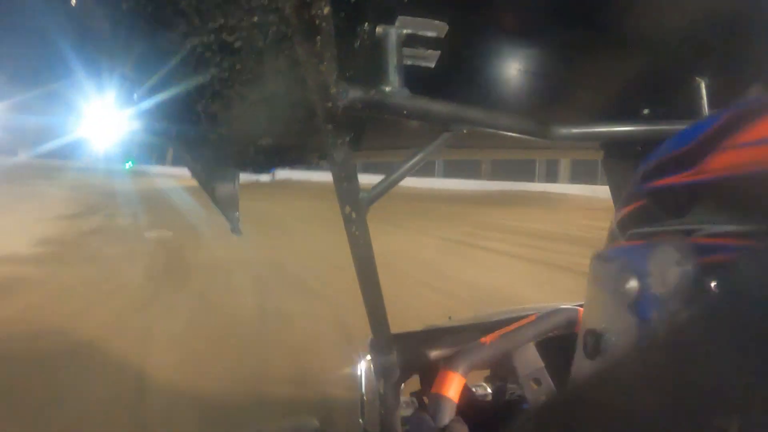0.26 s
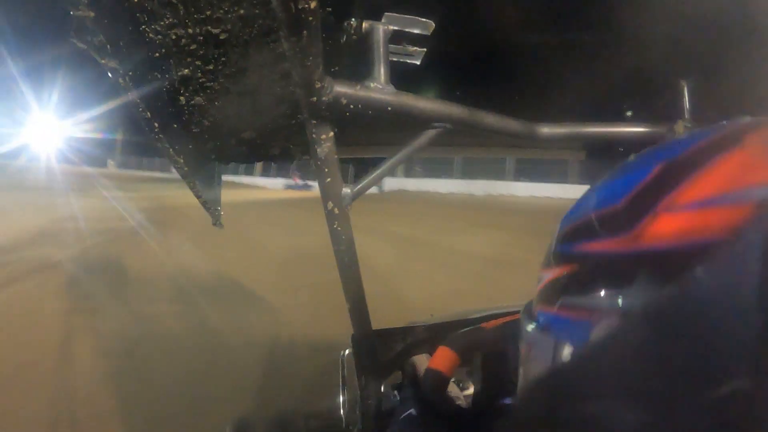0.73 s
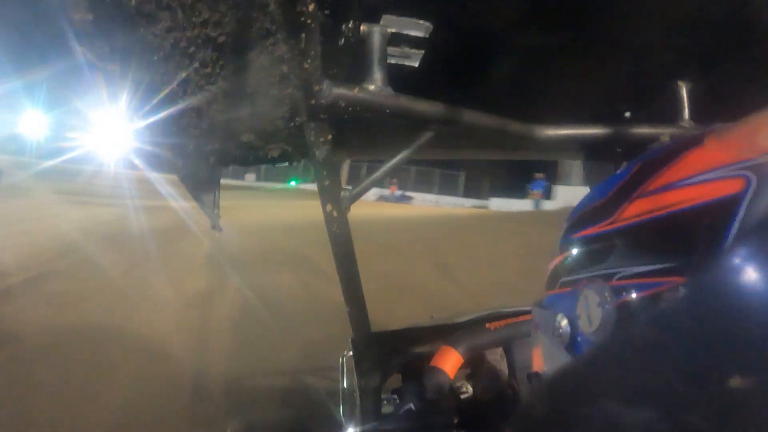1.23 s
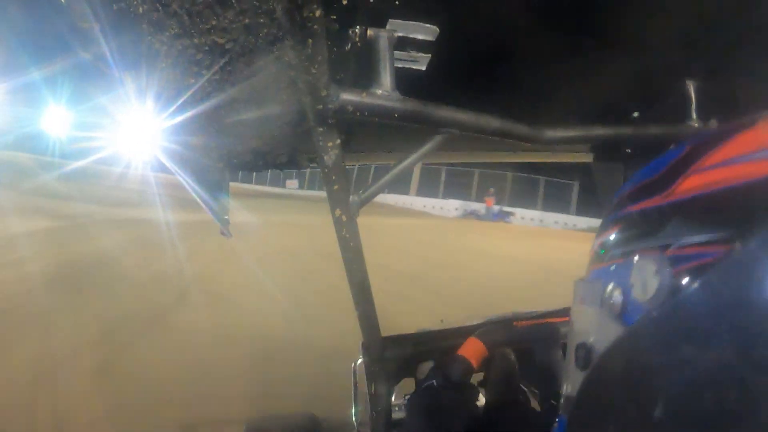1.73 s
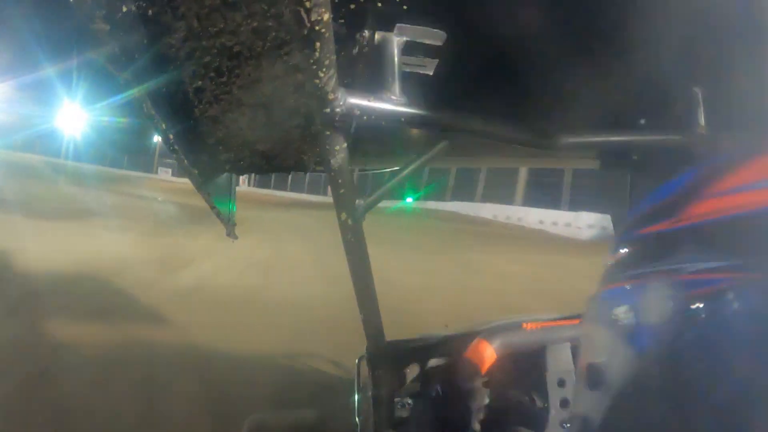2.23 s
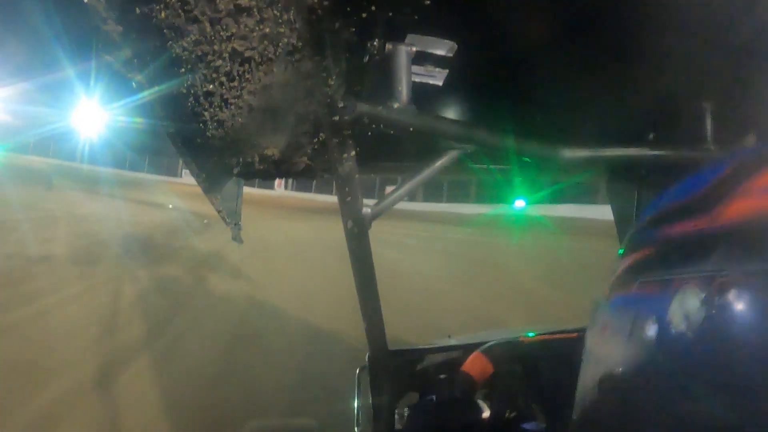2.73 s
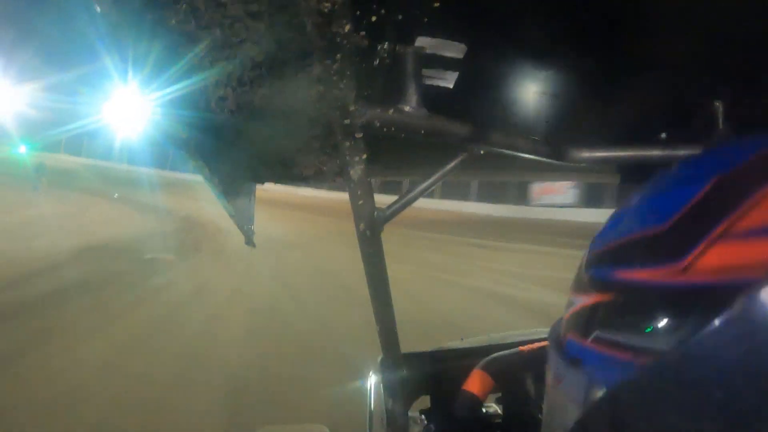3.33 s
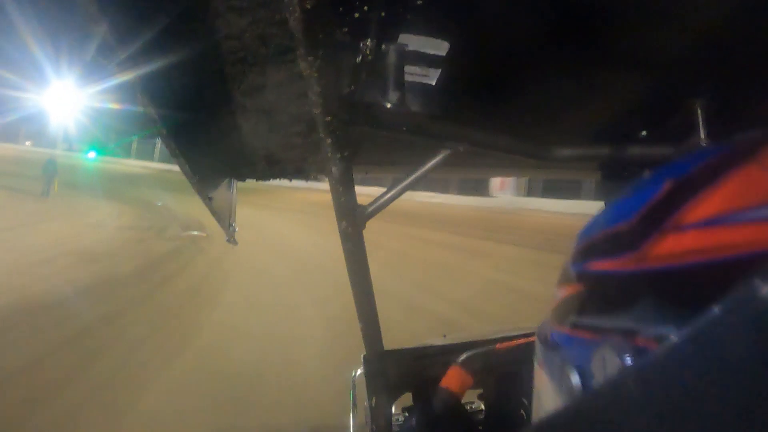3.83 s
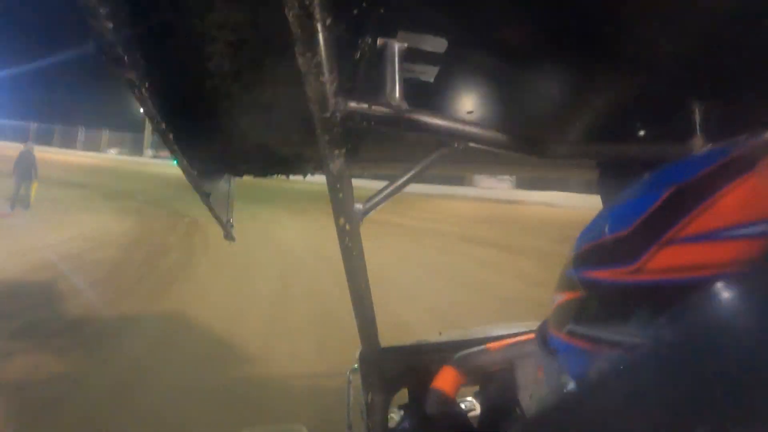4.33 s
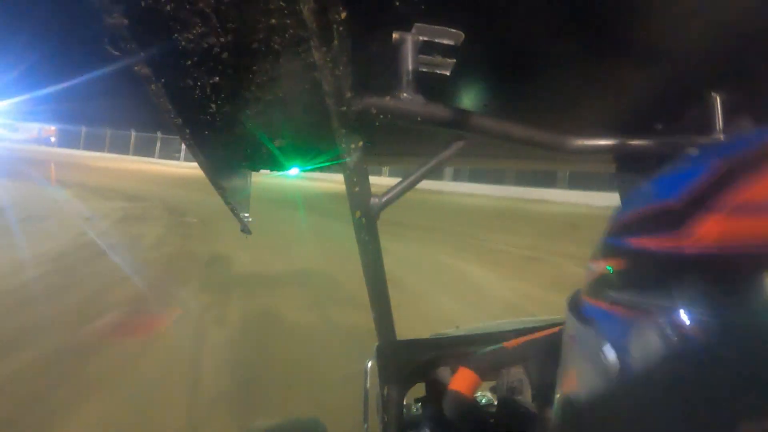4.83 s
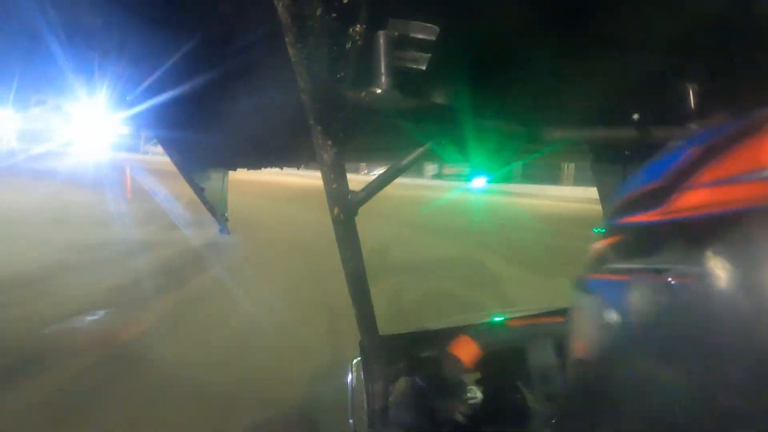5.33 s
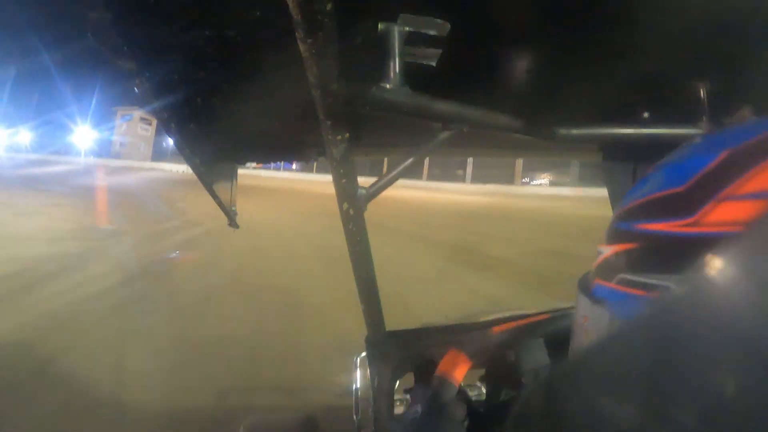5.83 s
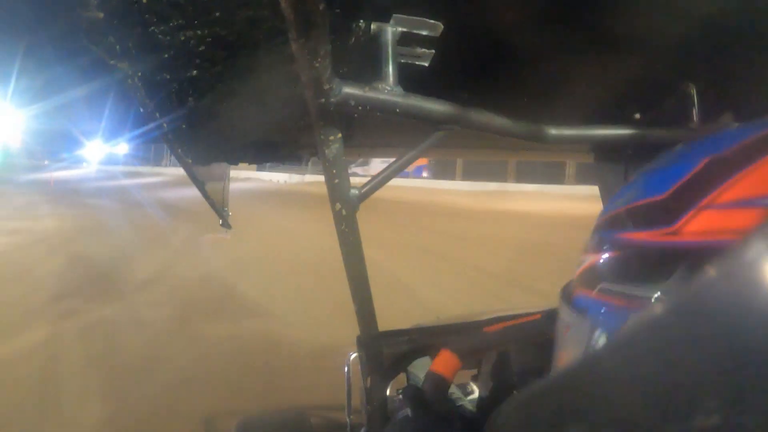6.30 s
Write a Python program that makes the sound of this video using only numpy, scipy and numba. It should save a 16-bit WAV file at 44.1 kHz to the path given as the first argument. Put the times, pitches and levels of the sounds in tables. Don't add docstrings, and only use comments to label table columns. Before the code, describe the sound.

A lumpy, throbbing race engine drones at steady revs inside a boxy, muffled case, over deep wind rumble, gas roar, rattles and grit.

```python
import sys
import numpy as np
from scipy import signal
from scipy.fft import rfft, irfft
from scipy.io import wavfile
from scipy.ndimage import uniform_filter1d
from numba import njit

SR = 44100
rng = np.random.default_rng(int(sys.argv[2]) if len(sys.argv) > 2 else 0)


def generate_wav(signal):
    frames = np.transpose(np.atleast_2d(signal))
    scaled = np.clip(frames, -1, 1) * 32767
    pcm = np.round(scaled).astype(np.int16)
    wavfile.write(sys.argv[1], SR, pcm)


def decibels_to_gain(level_db):
    exponent = np.asarray(level_db, float) / 20
    return 10 ** exponent


N = 289296

# (frequency [Hz], level [dB])
CASE_WALL = [(400, -11), (800, -4), (1200, 0.5), (1600, -7.5), (2100, -15), (3000, -12), (3500, -11.5),
             (5000, -31.5), (6500, -43.5), (8300, -40.5), (9500, -57.5), (11000, -64.5), (14000, -64)]
# (centre [Hz], width [Hz], boost [dB])
CASE_RINGS = [(1004, 220, 2.5), (1165, 23, 5), (1208, 30, 2.5), (1339, 160, 4.5), (1480, 60, 1.5),
              (1850, 90, 1.5), (2344, 64, 3.5), (2750, 22, 3), (2829, 140, 6.5), (3300, 120, -2.5),
              (5060, 390, 5), (6200, 330, 7.5)]
# (time [s], loss [dB])
FLOATS = [(.1, 1), (.57, -0.5), (.77, 1), (.9, 3), (1.06, 0.5), (1.55, 1.5), (1.8, 2), (1.94, 5.5),
          (2.25, 1), (2.46, 2.5), (2.88, 3.5), (2.93, 7), (4.23, 6.5), (4.46, 1.5), (5.42, 3.5),
          (5.97, 3.5), (6.24, 3.5)]


def level(x, db):
    return x * decibels_to_gain(db) / np.sqrt(np.mean(x ** 2))


def walk(rate_hz):
    hold = int(SR / rate_hz)
    steps = np.repeat(rng.standard_normal(N // hold + 1), hold)
    wander = uniform_filter1d(uniform_filter1d(steps, hold), hold)[:N]
    return (wander - wander.mean()) / wander.std()


def bumps(table, width_s):
    t = np.arange(N) / SR
    return sum(db * np.exp(-((t - s) / width_s) ** 2) for s, db in table)


def band(x, lo_hz, hi_hz):
    return signal.sosfilt(signal.butter(2, [lo_hz, hi_hz], "band", fs=SR, output="sos"), x)


def colour(x, spectrum, peaks=()):
    size = 8192
    hz = np.arange(size // 2 + 1) * SR / size + 1
    table_hz, table_db = np.transpose(spectrum)
    db = np.interp(np.log(hz), np.log(table_hz), table_db)
    for centre_hz, width_hz, boost_db in peaks:
        db = db + boost_db / (1 + (2 * (hz - centre_hz) / width_hz) ** 2)
    cepstrum = irfft(db * np.log(10) / 20)
    cepstrum[1:size // 2] *= 2
    cepstrum[size // 2 + 1:] = 0
    return signal.fftconvolve(x, irfft(np.exp(rfft(cepstrum))))[:N]


def throttle():
    # (start [s], length [s], rise over coasting [dB])
    squeezes = [(0.862, .1, 18), (1.459, 0.14, 12), (1.704, 0.36, 11.5), (2.272, .38, 11),
                (2.705, 0.088, 13), (2.888, .34, 14), (3.865, .08, 1.5), (4.055, 0.21, 7.5),
                (4.388, 0.054, 11), (4.78, .07, 6), (5.199, 0.16, 7.5), (5.56, 0.086, 5), (6.166, 0.06, 3)]
    t = np.arange(N) / SR
    held = sum(db * ((t > s) & (t < s + length)) for s, length, db in squeezes)
    return uniform_filter1d(held, size=int(0.06 * SR))


def crank_turns():
    # (time [s], crank speed [Hz])
    speeds = [
        (0, 48),
        (1.4, 47.8),
        (2, 48.5),
        (2.4, 49.3),
        (3.3, 49.94),
        (4.4, 50.32),
        (5.3, 49.8),
        (5.7, 48.25),
        (6.56, 47.48),
    ]
    times, hz = np.transpose(speeds)
    crank_hz = np.interp(np.arange(N) / SR, times, hz)
    return np.cumsum(crank_hz * (1 + 0.0029 * walk(8))) / SR


def airstream(throttle_db):
    lag_s = 0.85
    air_db = 1.1 * uniform_filter1d(throttle_db, size=int(lag_s * SR)) - 1.5 * bumps(FLOATS, 0.022)
    hiss = band(rng.standard_normal(N), 3600, 16000) * decibels_to_gain(0.97 * walk(18) + 0.51 * air_db)
    return level(colour(hiss, CASE_WALL, CASE_RINGS), -45.5)


def rumble():
    # (frequency [Hz], level [dB])
    rumble_tone = [(20, -32), (35, -17.5), (50, -2.5), (62, -2), (78, -5), (100, 2), (130, 2), (200, -1),
                   (240, -4), (330, -7.5), (430, -15), (550, -22.5), (800, -21.5), (1500, -48)]
    # (time [s], gain [dB])
    gusts = [(0.3, 2), (0.69, 3.5), (1.08, -0.5), (1.66, 10.5), (2.23, 6.5), (3.34, 11), (3.48, 3.5),
             (4.09, 7.5), (4.4, -1), (4.84, 5.5), (5.1, 1.5), (5.22, -2.5), (5.44, 7.5), (5.72, 9)]
    # (time [s], loss [dB])
    calms = [
        (0.15, 3),
        (0.49, 5),
        (1.55, -4),
        (2.1, 2.5),
        (2.41, -1),
        (3.02, -3),
        (4.47, 5.5),
        (5.62, 5.2),
        (5.86, -5),
        (6.51, 3.5),
    ]
    gust_s = 0.035
    rumble_db = -19.5 + 0.64 * bumps(gusts, gust_s) - 0.87 * bumps(calms, gust_s)
    return level(colour(rng.standard_normal(N), rumble_tone), 0) * decibels_to_gain(0.59 * rumble_db - 6.0)


def rattle(turns):
    # (time [s], peak [dB])
    grit = [(0.1948, -18.5), (0.2643, -14), (0.3135, -18), (0.45, -17), (0.8739, -14), (1.391, -15.5),
            (1.4451, -12.5), (1.644, -12), (1.698, -17), (2.152, -21.5), (2.2008, -8.5), (2.7566, -12),
            (2.7955, -16), (3.0639, -17), (3.1566, -9.5), (3.2176, -20.5), (3.7638, -14), (3.8597, -15),
            (4.0277, -15.5), (4.4072, -15.5), (4.6027, -19.5), (4.7688, -16), (5.01, -13), (5.577, -17.5),
            (5.9273, -11.5), (6.394, -10), (6.4588, -13.5), (6.5033, -7.5)]
    # (time [s], gain [dB])
    jolts = [(.2, 2), (.62, 5.5), (.68, 4), (.94, 6), (1.42, -0.5), (3.27, 6), (4.04, 2.5), (4.61, 3.5),
             (4.88, 3.5), (5.45, 5), (5.75, 1.5), (6.02, 2), (6.4, 2)]
    chance = rng.random((2, N))
    ticks_per_s = 6000
    hardness = decibels_to_gain(-1.6 * np.log(chance[1] + 1e-9))
    ticks = (chance[0] < ticks_per_s / SR) * hardness * rng.choice([-1, 1], N)
    ticks = level(ticks, 0) * (1 + 0.19 * np.cos(2 * np.pi * turns)) * decibels_to_gain(0.7 * walk(45))

    age = np.arange(1300) / (0.003 * SR)
    sprays = np.zeros(N)
    for s, db in grit:
        i = int(s * SR)
        grains = rng.standard_normal(len(age))
        sprays[i:i + len(age)] += decibels_to_gain(db + 25) * grains * age * np.exp(-age)

    low_ticks = band(ticks, 1910, 3640) * decibels_to_gain(0.77 * walk(25))
    high_ticks = band(ticks, 3600, 9000) * decibels_to_gain(0.66 * walk(30))
    struck = low_ticks + high_ticks + band(sprays, 2620, 3080)
    shake_db = 1.18 * bumps(jolts, 0.013) - 1.3 * bumps(FLOATS, 0.022) + 0.13 * walk(17)
    return level(colour(struck, CASE_WALL, CASE_RINGS), 0) * decibels_to_gain(-28.5 + shake_db + 1.44)


def roar(turns, load_db):
    # (time [s], loss [dB])
    falters = [
        (0.11, 9),
        (0.24, 8),
        (1.82, 5),
        (2.45, 3),
        (3.54, 2.5),
        (4.45, 5.5),
        (5.27, 1.9),
        (5.41, 2.5),
        (6.37, 6),
        (6.51, 3),
    ]
    puffs = 1 + 0.11 * np.cos(2 * np.pi * 4 * turns)
    gas = signal.sosfilt(signal.butter(2, 2300, fs=SR, output="sos"), rng.standard_normal(N))
    pulsed = gas * puffs * decibels_to_gain(0.23 * walk(40))
    roar_db = -21.5 + 0.053 * load_db - 0.57 * bumps(falters, 0.03)
    return level(colour(pulsed, CASE_WALL, CASE_RINGS), 0) * decibels_to_gain(roar_db)


def mount(load_db):
    # (time [s], loss [dB])
    ruts = [(0.08, 5.5), (0.42, 3), (0.53, -5), (0.89, 0), (1.01, -1), (1.23, 5.5), (1.5, 4), (1.65, -4),
            (2.0, 6), (2.2, 23), (2.33, 2), (2.47, 9), (3.03, 0), (3.11, 6), (3.19, 7), (3.43, 19),
            (3.93, 10), (4.23, -0.5), (4.31, 2.5), (4.84, 0), (5.1, 9), (5.3, 6), (5.89, 12.5), (6.2, 5.5),
            (6.4, 8), (6.48, -1.5)]
    # (time [s], gain [dB])
    kicks = [(.6, 3), (.75, -0.5), (1.12, 2.5), (1.45, 1.5), (1.8, 5.5), (2.07, 3), (2.7, 2.5), (3.25, 3.5),
             (3.6, -1.5), (4.16, 4), (4.47, 3), (4.95, 2), (5.6, 3.5), (6.33, 0.5)]
    swing_db = -16.5 - 0.25 * load_db + 1.6 * walk(14)
    swing_db = swing_db - 1.3 * bumps(ruts, 0.025) + bumps(kicks, 0.05)
    hz = 82.2 + 1.5 * walk(6)
    swing = np.sin(2 * np.pi * np.cumsum(hz) / SR + 0.62 * walk(22))
    return np.sqrt(2) * decibels_to_gain(swing_db - 1.07) * swing


def frame(turns, throttle_db):
    # (multiple of crank speed, level [dB], share of the throttle [0-1])
    orders = [
        (1, -43.5, 0.04),
        (2, -27, 0.4),
        (3, -28, 0),
        (4, -23, 1),
        (6, -39.5, 0.98),
        (8, -45.5, 1),
    ]
    looseness = decibels_to_gain(-0.7 * throttle_db - 2.5) + 0.19
    out = 0
    for order, db, share in orders:
        phase = 2 * np.pi * order * turns + 0.58 * looseness * walk(25)
        waver = decibels_to_gain(2.77 * looseness * walk(20)) * np.sin(phase)
        out = out + np.sqrt(2) * decibels_to_gain(db + share * throttle_db) * waver
    return out


def scene():
    load_db = throttle()
    throttle_db = load_db - 7.5
    turns = crank_turns()
    background = airstream(throttle_db) + rumble() + rattle(turns)
    engine = roar(turns, load_db) + mount(load_db) + frame(turns, throttle_db)
    return (background + engine)[None]


@njit
def follow(x, attack, release):
    e, y = 0.5, np.empty(len(x))
    for i in range(len(x)):
        e += (abs(x[i]) - e) * (attack if abs(x[i]) > e else release)
        y[i] = e
    return y


def limiter(x):
    attack_s, release_s = 0.00097, 0.016
    peak = uniform_filter1d(follow(x, 1 / (attack_s * SR), 1 / (release_s * SR)), size=90)
    early = np.roll(peak, -64)
    return x * (0.45 / np.maximum(early, 0.15)) ** 0.6


def roll_off(x):
    return signal.sosfilt(signal.butter(12, 15000, fs=SR, output="sos"), x)


def record(dry):
    # (frequency [Hz], level [dB])
    treble_loss = [(4000, 0), (6500, -2.5), (8000, -14.5), (10000, -27), (14000, -38)]
    rounded = 1.28 * np.tanh(limiter(dry[0]) / 1.316)
    dull = colour(rounded, treble_loss)
    return roll_off(dull[None])


dry = scene()
out = record(dry)
generate_wav(out)
```